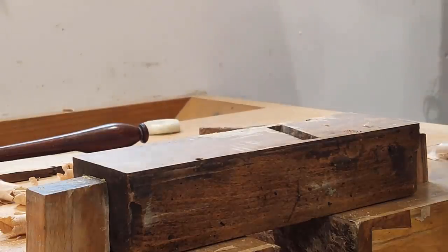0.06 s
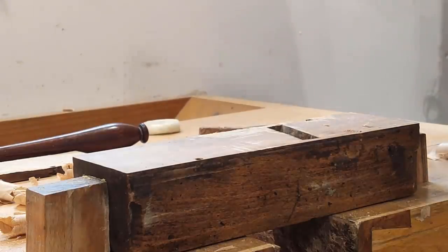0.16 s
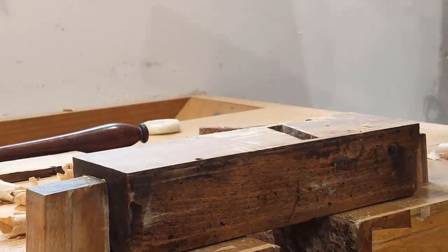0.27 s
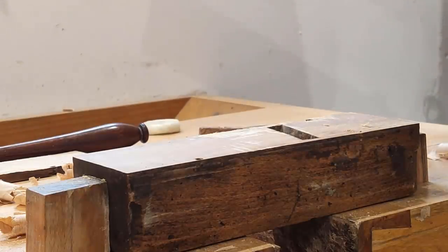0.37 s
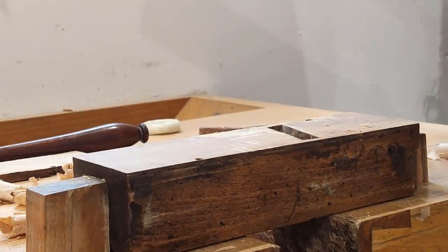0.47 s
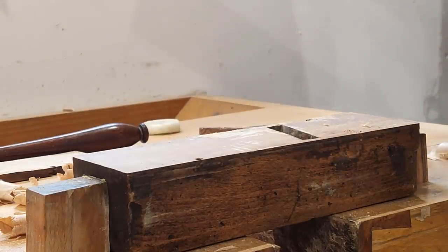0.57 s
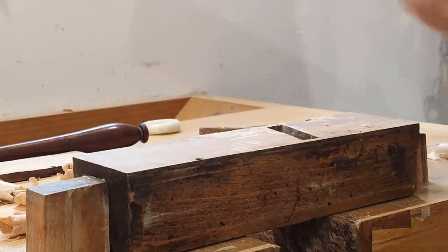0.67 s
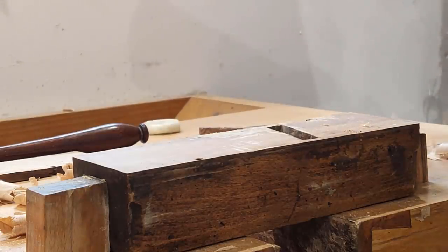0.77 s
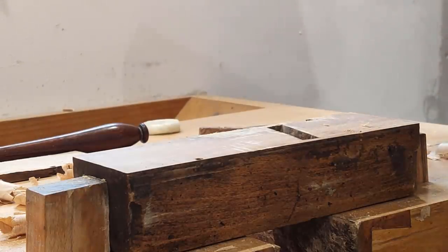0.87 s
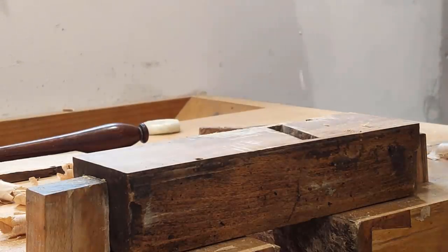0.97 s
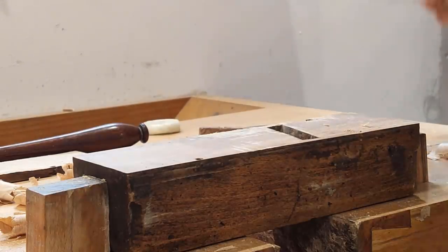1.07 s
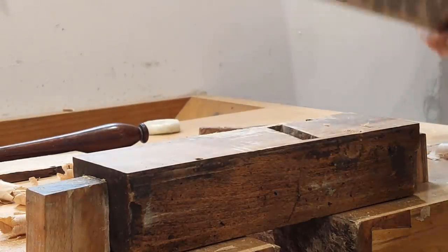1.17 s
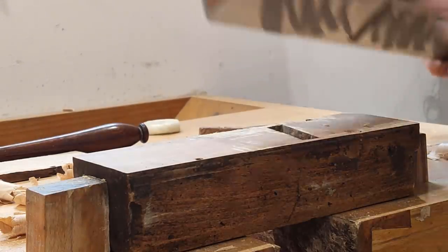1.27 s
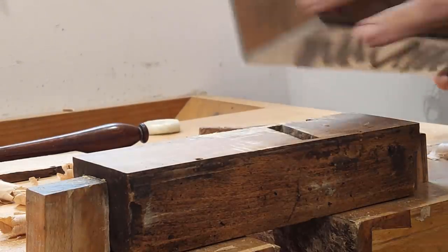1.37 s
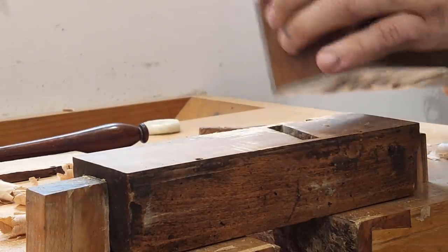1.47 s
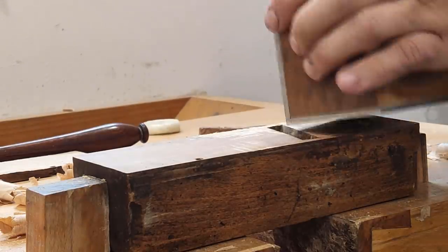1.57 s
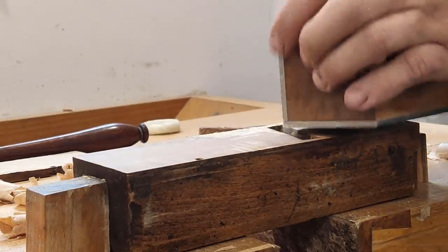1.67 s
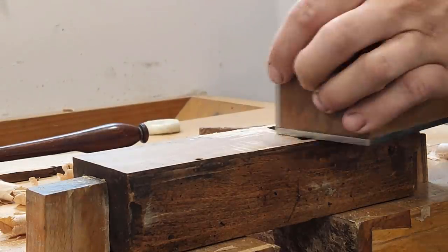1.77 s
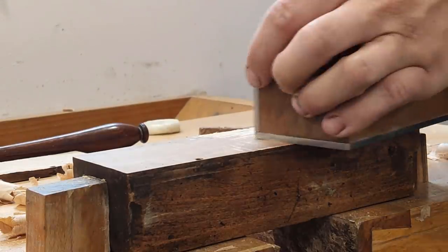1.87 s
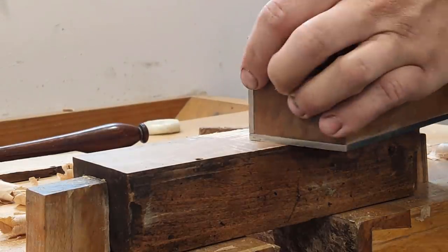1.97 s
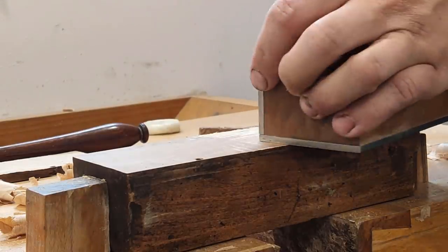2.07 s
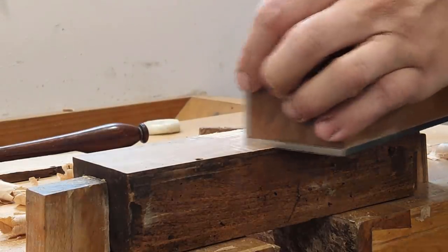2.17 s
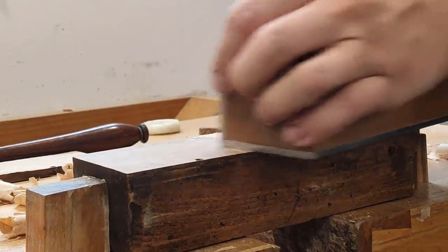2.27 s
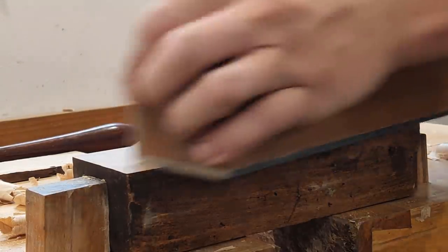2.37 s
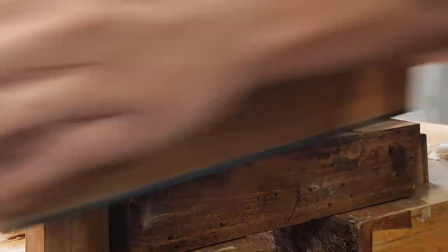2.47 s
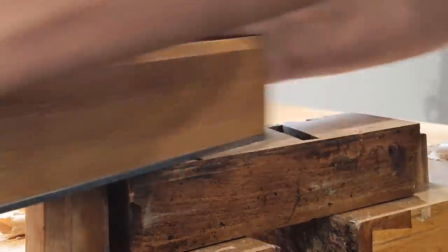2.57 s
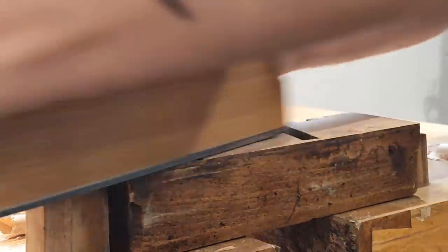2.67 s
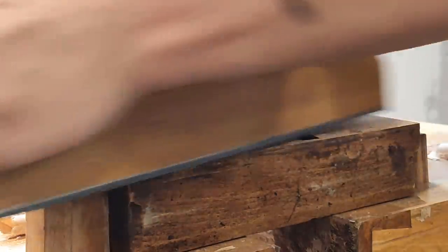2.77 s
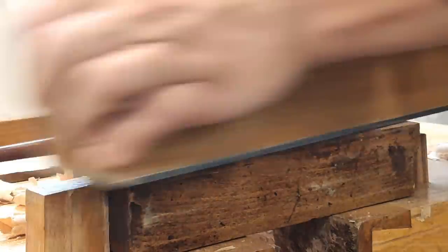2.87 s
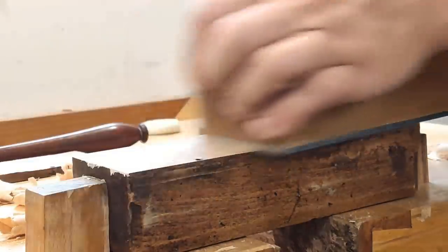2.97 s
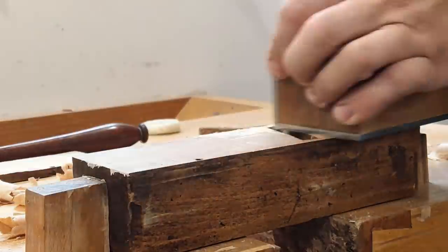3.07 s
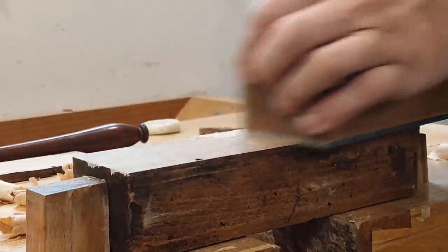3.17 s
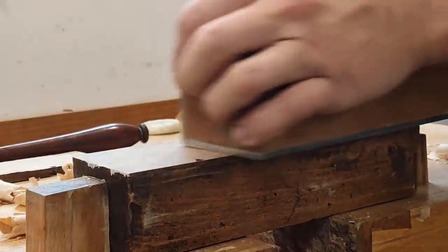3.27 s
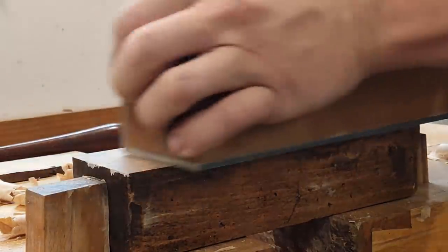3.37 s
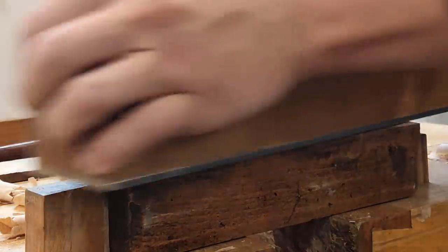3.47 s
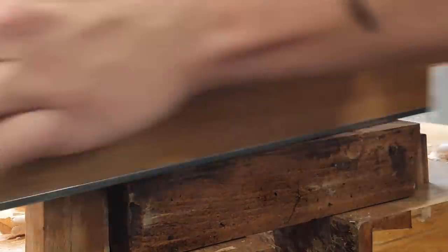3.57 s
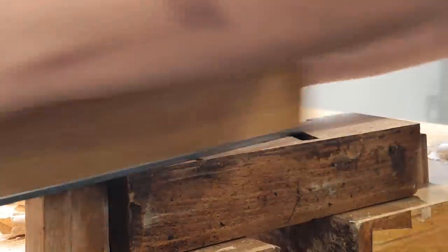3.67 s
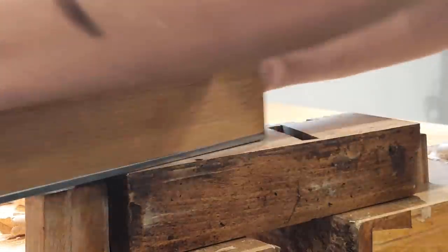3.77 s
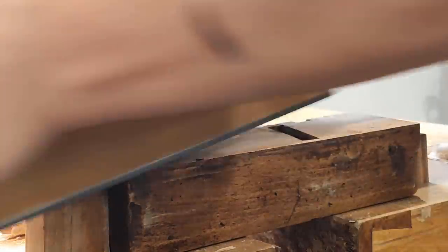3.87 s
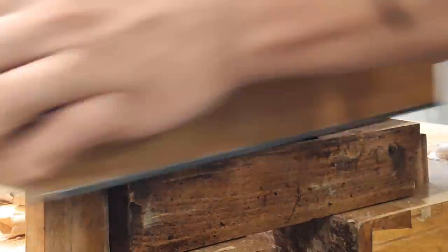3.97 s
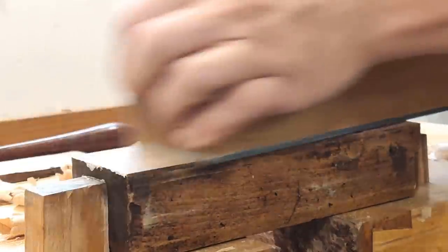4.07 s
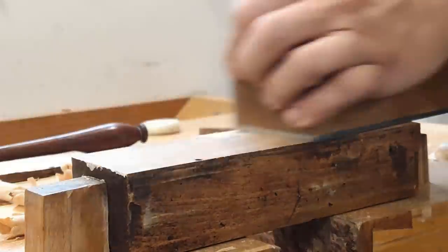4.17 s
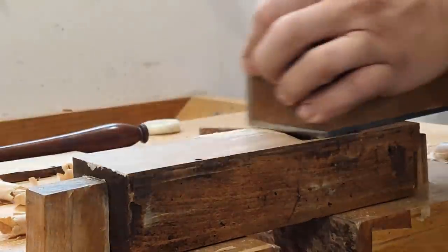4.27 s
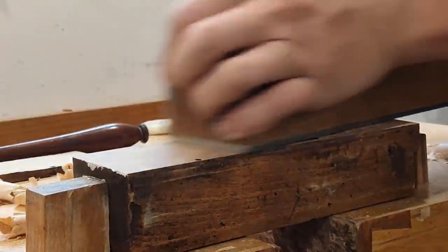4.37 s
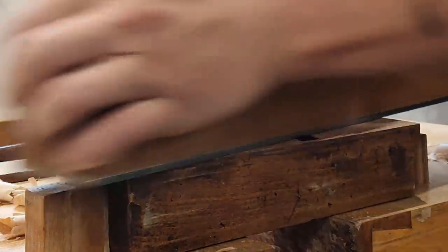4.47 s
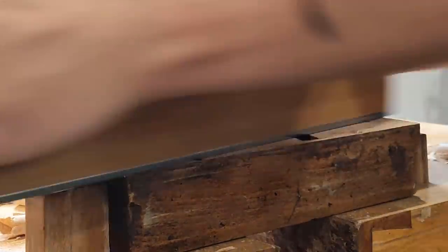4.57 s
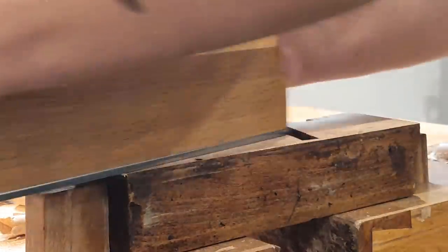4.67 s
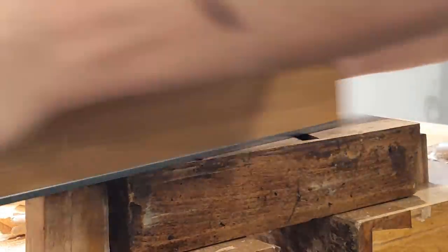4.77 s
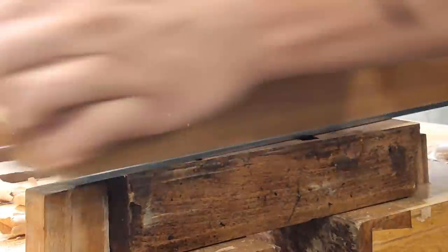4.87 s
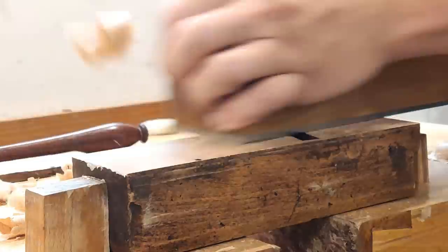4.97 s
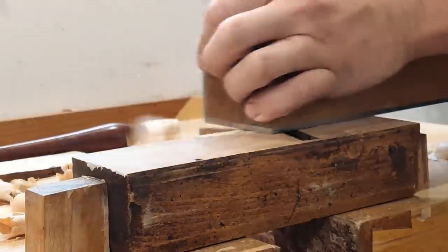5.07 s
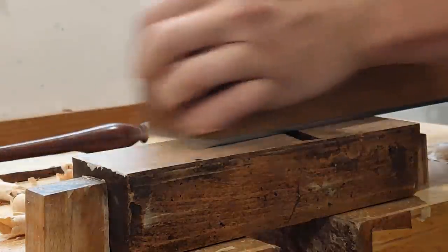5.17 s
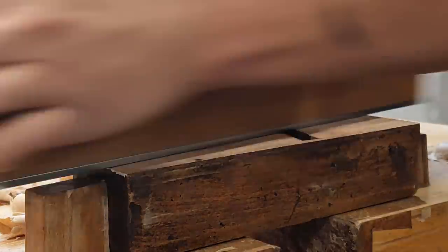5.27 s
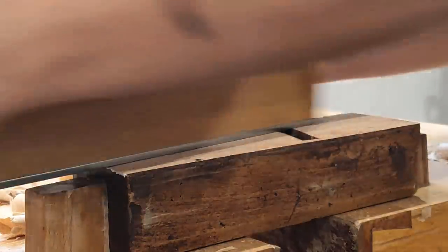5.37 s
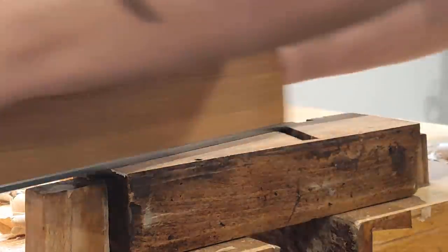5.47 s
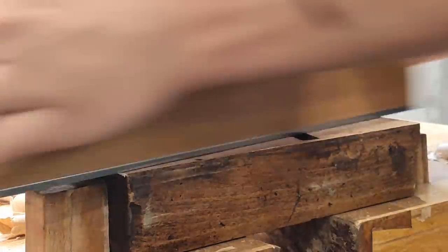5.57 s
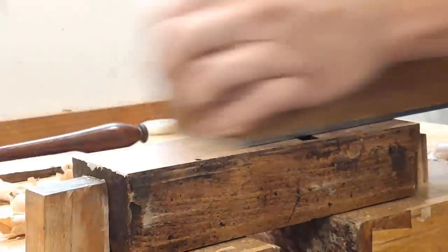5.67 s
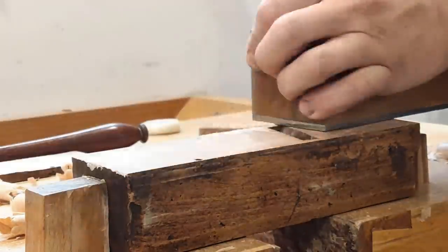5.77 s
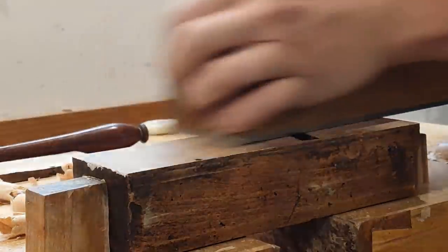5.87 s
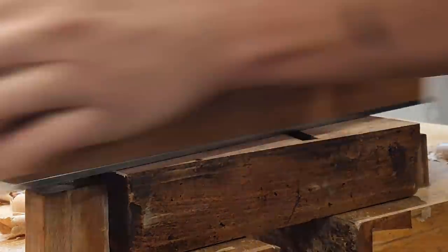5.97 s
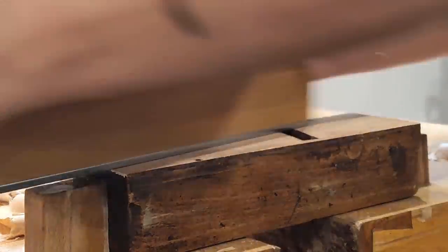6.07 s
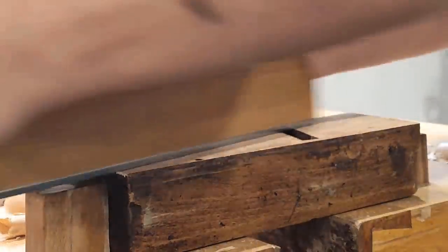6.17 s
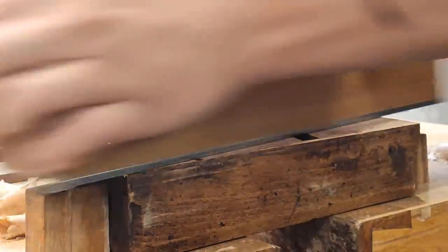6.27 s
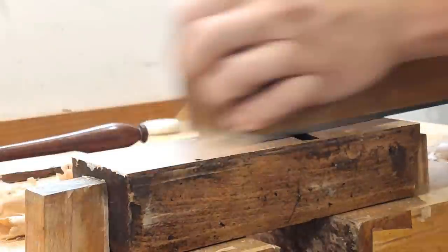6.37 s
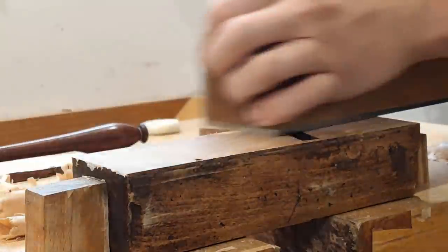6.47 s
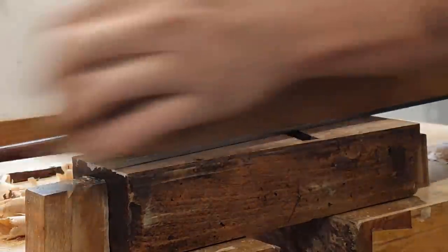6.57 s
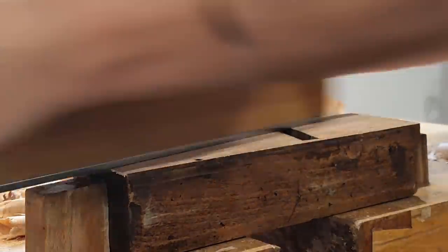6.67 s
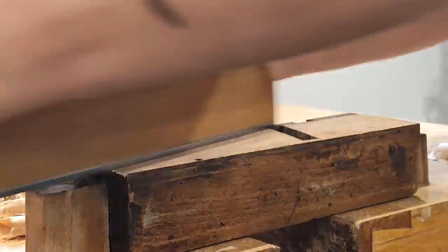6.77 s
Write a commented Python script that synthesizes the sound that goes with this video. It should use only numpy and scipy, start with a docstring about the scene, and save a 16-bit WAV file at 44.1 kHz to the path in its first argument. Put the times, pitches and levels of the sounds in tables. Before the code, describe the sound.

A hardwood board knocks down onto an upturned wooden plane, then rasps back and forth in quick short strokes with knocks, hiss and soft rustling.

```python
"""A board knocks down, then rasps to and fro in short strokes, with soft rustles and a quiet hum.
The hardwood board is pushed over the iron of a plane held upside down in a bench vice.
Dense stick-slip noise is filtered into rasp and hiss and rings board, plane, vice and bench.
Knocks are noisy pushes into the same modes; clothes and fingers are band-passed crackle.
A small hard-walled workshop adds a decaying noise tail."""
import sys
import numpy as np
from scipy import signal
from scipy.fft import rfft, irfft, next_fast_len
from scipy.io import wavfile
from scipy.ndimage import uniform_filter1d

SR = 44100
rng = np.random.default_rng(int(sys.argv[2]) if len(sys.argv) > 2 else 0)


def master_out(mix):
    """Clip the mix to full scale and print it as 16-bit PCM to the path in sys.argv[1]."""
    frames = np.transpose(np.atleast_2d(mix))
    ceiling = np.clip(frames, -1, 1)
    pcm = np.round(ceiling * 32767).astype(np.int16)
    wavfile.write(sys.argv[1], SR, pcm)


N = 300762

# bench top modes: f/Hz, width/Hz, level/dB
BENCH_MODES = [(95.5, 32, -6.5), (106.8, 14, -1), (125.6, 21, 2), (159.6, 17.2, 1), (182.6, 19, -5),
               (205.5, 14.6, 1), (237.4, 36.5, -11)]
# vice modes: f/Hz, width/Hz, level/dB
VICE_MODES = [(269, 80, -8), (357.7, 53, 1.5), (398.6, 52, 2), (460.4, 107, -2), (522.3, 11.4, -1.5),
              (578, 42, -7.5)]
# plane body modes: f/Hz, width/Hz, level/dB
PLANE_MODES = [(663, 22, -14), (718.5, 36, 1), (770, 195, 1), (815, 71, 4), (911, 71, -5.5)]
# board modes: f/Hz, width/Hz, level/dB
BOARD_MODES = [(1385, 60, -6), (1497, 45, 0), (1560, 55, -1), (1650, 80, -4), (1803, 60, -10),
               (1950, 120, -9)]


def undb(db):
    """Gain of a level in dB."""
    return 10 ** (np.asarray(db) / 20)


def rms(x):
    """Root mean square over all rows."""
    return np.sqrt(np.mean(x ** 2))


def unit(x):
    """Scale to rms 1."""
    return x / rms(x)


def on_log(hz, points):
    """Read a (Hz, value) line on a log-frequency axis."""
    f, v = np.transpose(points)
    return np.interp(np.log(hz + 1), np.log(f), v)  # + 1 keeps 0 Hz finite


def colour(x, points):
    """Shape the spectrum by (Hz, dB) points."""
    length = x.shape[-1]
    size = next_fast_len(length)
    hz = np.arange(size // 2 + 1) * SR / size
    return irfft(rfft(x, size) * undb(on_log(hz, points)), size)[..., :length]


def band(x, lo_hz, hi_hz):
    """Band-pass."""
    sos = signal.butter(2, [lo_hz, hi_hz], "band", fs=SR, output="sos")
    return signal.sosfilt(sos, x)


def ring(x, modes):
    """Drive a body's damped modes, neighbours in opposite sign."""
    out = 0
    for k, (hz, width_hz, db) in enumerate(modes):
        b, a = signal.iirpeak(hz, hz / width_hz, fs=SR)
        out = out + (-1) ** k * undb(db) * signal.lfilter(b, a, x)
    return out


def walk(rate_hz):
    """Random line of rms 1 that slews to a new value every 1 / rate_hz seconds."""
    k = int(SR / rate_hz)
    steps = np.repeat(rng.standard_normal(N // k + 1), k)[:N]
    return unit(uniform_filter1d(steps, k))


def slips(spread_db, patchy_db, count):
    """Dense tiny slips of uneven size, stronger in patches; the rows share sizes, not signs."""
    sizes = undb(spread_db * rng.exponential(size=N) + patchy_db * walk(60))
    return unit(rng.standard_normal((count, N)) * sizes)


def pair(size):
    """Left and right room noise, more alike in the bass than in the treble."""
    # left-right correlation: f/Hz, correlation
    likeness = [(150, 0.93), (300, .75), (600, 0.44), (1200, 0), (3000, .0)]
    fast = 2 * next_fast_len(size // 2 + 1)
    hz = np.arange(fast // 2 + 1) * SR / fast
    like = np.clip(on_log(hz, likeness), 0, 0.99)
    mid, side = rfft(rng.standard_normal((2, fast))) * np.sqrt([1 + like, 1 - like])
    return irfft(np.array([mid + side, mid - side]), fast)[:, :size] / np.sqrt(2)


def workshop():
    """Quiet noisy air, a wavering hum, and the sway of the bench pushing air at 15-35 Hz."""
    # spectrum of the air: f/Hz, relative density/dB
    air_spectrum = [(35, -20), (60, 0), (81, -15), (220, -7), (247, -29), (277, -17.5), (381, -14),
                    (457, -23), (755, -22), (1110, -25), (3810, -32.5), (7560, -44.5), (14000, -41.5)]
    # hum tones: f/Hz, level/dB ahead of the offset below
    hum_tones = [(52, -65), (203, -60.5), (244, -61.5)]
    # bench sway: t/s, level/dB
    sway_curve = [(0.0, -67), (0.09, -56), (2.28, -49.5), (2.3, -41), (2.55, -38.5), (3.23, -55),
                  (3.3, -36), (3.76, -40), (4.2, -47), (4.63, -31.5), (5.13, -51), (5.45, -30), (5.96, -49),
                  (6.14, -26), (6.44, -50), (6.82, -33)]
    t = np.arange(N) / SR
    air_db = -51 + 1.5 * walk(2.5)
    air = unit(colour(pair(N), air_spectrum)) * undb(air_db)
    hum = 0
    for hz, db in hum_tones:
        level = undb(db + 2.5 + 0.4 * walk(6))
        phase = 2 * np.pi * np.cumsum(hz * (1 + 0.0096 * walk(6.3))) / SR
        hum = hum + level * np.sin(phase)
    sway_noise = unit(band(band(pair(N), 15, 35), 15, 35))
    sway = sway_noise * undb(np.interp(t, *np.transpose(sway_curve)))
    return air + hum + sway


def answer(lag, size=2 ** 15):
    """Room response to a click: direct sound, left late by lag samples, and a tail decaying per octave."""
    # reverberation time: f/Hz, t60/s
    decay_times = [(125, 0.58), (400, 0.44), (1500, 0.59), (4500, 0.61), (11000, 0.47)]
    room_db = 0  # tail energy against direct sound
    t = np.arange(size) / SR
    octave = np.log2(np.arange(size // 2 + 1) * SR / size + 1)
    noise = rfft(pair(size))
    tail = 0
    for k in range(5, 16):
        octave_noise = irfft(noise * np.clip(1 - np.abs(octave - k), 0, 1))
        tail = tail + octave_noise * undb(-60 * t / on_log(2. ** k, decay_times))
    onset = np.clip((t - 0.002) / 0.0024, 0, 1)
    near = 1 + 1.44 * np.exp(-t / 0.013)  # near surfaces answer first and strongest
    tail = tail * onset * near
    out = undb(room_db) * tail / np.sqrt(np.sum(tail ** 2) / 2)
    out[0, max(lag, 0)] = out[1, max(-lag, 0)] = 1
    return out / np.sqrt(1 + undb(2 * room_db))


def room(x):
    """The work moves along the bench: cross-fade cyclically through the answers of several places."""
    # lag of the left channel at each place: lag/samples
    left_lags = [-9, 3, 14, -1]
    place_s = 0.13
    count, size = len(left_lags), next_fast_len(N + SR)
    place = np.arange(N) / SR / place_s % count
    out = 0
    for k, lag in enumerate(left_lags):
        away = np.abs((place - k + count / 2) % count - count / 2)
        here = x * np.cos(np.pi / 2 * np.clip(away, 0, 1))
        out = out + rfft(here, size) * rfft(answer(lag), size)
    return irfft(out, size)[:, :N]


def rustle():
    """Cloth and fingers brush in soft crackly noise; each brush swells and fades linearly in dB."""
    # brushes: peak t/s, swell/s, fade/s, mid level/dB, top against mid/dB, low against mid/dB
    brushes = [(.01, 0.013, 0.085, -59.5, -12, 13), (.302, 0.12, 0.13, -53, -5, -2),
               (.565, 0.13, 0.17, -47, -8, -16), (0.69, 0.12, 0.013, -42, -4.5, -5.5),
               (.916, 0.025, .05, -49.5, 6, -7), (.956, 0.028, 0.023, -47.5, -21, -28),
               (1.42, 0.0038, 0.063, -43, -5.5, -23), (1.646, 0.024, .02, -54.5, -2, -28),
               (2.146, 0.029, 0.032, -52.5, -1, 1.5), (2.88, 0.2, 0.088, -47.5, -1, 0.5),
               (4.0, 0.29, 0.09, -52, -18, 4), (4.886, 0.065, 0.032, -44, 0, -6),
               (5.65, 0.051, 0.021, -52, 8, 2), (6.32, 0.054, 0.036, -53, -12, 9.5)]
    swell_db, restless_db = 18.5, -73.5  # rise over a swell, fall over a fade; constant faint rustle
    t = np.arange(N) / SR
    gains = undb(restless_db) * undb([[0], [-8], [-3]])
    for s, swell_s, fade_s, peak_db, top_db, low_db in brushes:
        slope_s = np.clip(np.where(t < s, swell_s, fade_s), 0.001, 1)
        shape_db = -swell_db * np.abs(t - s) / slope_s
        gains = gains + undb(peak_db + shape_db) * undb([[0], [top_db], [low_db]])
    mid, top, low = gains
    fibres = slips(spread_db=2.4, patchy_db=2.0, count=3)
    out = mid * unit(band(fibres[0], 1280, 6550))
    out = out + top * unit(band(fibres[1], 10000, 20000))
    return out + low * unit(band(fibres[2], 340, 1440))


def knocks():
    """Each blow is a short rattling push into bench, vice, plane and board, with a dry crack and a tick."""
    # blows: t/s, then peak levels: bench top/dB, vice and plane/dB, board/dB, crack/dB, tick/dB
    blows = [(1.678, -13.5, -24.5, -62, -48, -25.5), (1.689, -19.5, -17, -59, -52, -47),
             (1.703, -21, -14.5, -58, -53, -54), (1.829, -23, -16.5, -26.5, -28.5, -51),
             (1.834, -18.5, -13, -47, -51, -60), (2.27, -42, -47, -37, -48, -55),
             (2.291, -27.5, -39, -37, -34, -46), (2.549, -44, -24, -34, -13, -11),
             (2.71, -39, -32.5, -36, -31.5, -58), (2.898, -19, -22, -11.5, -19, -33),
             (2.92, -11.5, -17, -44, -52, -32), (3.102, -39, -24, -22.5, -17, -38),
             (3.289, -33, -36, -20.5, -19.5, -36), (3.709, -34, -25.5, -40, -28, -20.5),
             (4.029, -14, -16.5, -27, -24, -17.5), (4.076, -17, -6, -18, -14, -29),
             (4.082, -20, -10, -28, -26, -40), (4.096, -26, -16, -40, -44, -39),
             (4.111, -22, -10, -42, -40, -44), (4.125, -26, -14, -15, -24, -41),
             (4.249, -30, -19.5, -15, -42, -46), (4.435, -21.5, -23, -16, -14.5, -25),
             (4.932, -33, -45, -42, -19.5, -29), (5.023, -55, -50, -7, -17, -12.5),
             (5.228, -29.5, -33, -21, -31, -42), (5.6, -27, -75, -74, -71, -53),
             (5.641, -36, -40, -50, -58, -53), (5.663, -37, -34, -22, -35, -31),
             (5.745, -38, -21, 1, -17, -4.5), (5.808, -53, -17, -39, -31, -36),
             (5.966, -21, -31, -17, -22, -36), (6.052, -21, -24, -25, -34, -25),
             (6.337, -36, -27.5, -19, -24, -36), (6.385, -40, -47, -18, -41, -36),
             (6.422, -27, -27, -6, -27, -8), (6.436, -39, -31, -5.5, -19, -16),
             (6.598, -25.5, -27, -18, -22, -30), (6.759, -23, -37, -47, -40, -40)]
    out, t = np.zeros(N + SR), np.arange(SR // 6) / SR
    hands = np.exp(-np.clip(t - 0.005, 0, 1) / 0.0025)  # the hands damp the board
    for s, *parts_db in blows:
        grit = rng.standard_normal((4, len(t)))
        push = (1 + 3.24 * grit[0]) * np.exp(-t / 0.0045)
        thud = ring(band(push, 130, 400), BENCH_MODES)
        knock = ring(band(push, 206, 730), VICE_MODES)
        knock = knock + undb(-9.5) * ring(band(push, 200, 1280), PLANE_MODES)
        knock = knock + undb(-15) * band(grit[0] * np.exp(-t / 0.0034), 300, 1650)
        tap = grit[1] * t * np.exp(-t / 0.00076)
        tock = ring(band(tap, 1000, 1640), BOARD_MODES) * hands
        crack = band(grit[2] * np.exp(-t / 0.0045), 1140, 2500)
        tick = band(grit[3] * np.exp(-t / 0.0013), 3400, 8100)
        i = int(s * SR)
        for part, db in zip((thud, knock, tock, crack, tick), parts_db):
            out[i:i + len(t)] += undb(db) * part / np.abs(part).max()
    return out[:N]


def controls():
    """Gains of coarse rasp, bright rasp, hiss, board, plane, vice and bench; zero between strokes."""
    # one curve a stroke, first the end of a shove, then cuts and drags back in turn:
    # t/s, rasp/dB, hiss against rasp/dB, vice judder/dB
    curves = [
        [(0.0, -45, -14, -48), (0.028, -70, -9, -53), (0.126, -73, 12, -67), (0.132, -64, -5, -68),
         (0.138, -76, 6, -64), (0.178, -77, 6, -67), (0.2, -74, 0, -78)],
        [(2.265, -49, -22, -42), (2.293, -50.5, -2, -38.5), (2.361, -56, -2, -44), (2.417, -38, -3.5, -43),
         (2.529, -36, -2.5, -46.5), (2.543, -30, -2.5, -35.5), (2.7, -58, 4, -55)],
        [(2.9, -42, -17, -20), (2.93, -38.5, -6, -29), (2.972, -39, -8, -36), (3.024, -39, -15, -38.5),
         (3.076, -44.5, -23, -61), (3.112, -48, -10, -26.5), (3.18, -51, 0, -45)],
        [(3.19, -43, -3, -53), (3.278, -39, 2, -54), (3.312, -31.5, -10, -35), (3.37, -41.5, -3, -34.5),
         (3.63, -29, -14.5, -47), (3.722, -31, -2, -42.5), (3.84, -85, -19, -50)],
        [(4.03, -25, -7, -23), (4.068, -61, -13, -16), (4.078, -22.5, -17, -16), (4.112, -35, -26, -16.5),
         (4.22, -34, -21.5, -36), (4.254, -49, -6, -31), (4.36, -59, -21, -55)],
        [(4.435, -42, -15, -36), (4.447, -38.5, 0, -27.5), (4.507, -32, -14, -29), (4.543, -33, -1, -28),
         (4.579, -25.5, -7.5, -37.5), (4.657, -35, -2, -37), (4.78, -61.5, -3, -62)],
        [(4.93, -33.5, -5, -37.5), (4.962, -44, -6, -36), (5.004, -43, -6, -45), (5.028, -29, -5.5, -35),
         (5.066, -31.5, -8, -34), (5.122, -42.5, -12, -31.5), (5.19, -60, -13, -69)],
        [(5.215, -40, -11, -41), (5.227, -39, -5, -42), (5.311, -30.5, -6, -28), (5.341, -36.5, 5.5, -33),
         (5.389, -26.5, 2.5, -34), (5.459, -46, -4, -35.5), (5.55, -70, -13, -69)],
        [(5.662, -32, -11, -42), (5.726, -28.5, -13, -42), (5.756, -29.5, 0, -35.5), (5.792, -34.5, -10, -29),
         (5.814, -45, -10, -29.5), (5.868, -63, -15, -42.5), (5.92, -48, -4, -29)],
        [(5.962, -29, -6, -25), (5.97, -28.5, -12, -36), (6.002, -30.5, -3.5, -29.5), (6.108, -30, 4.5, -34.5),
         (6.13, -31.5, -2, -28), (6.174, -51, -17, -53.5), (6.26, -62, -8, -29)],
        [(6.335, -37, -23, -41.5), (6.357, -35.5, -2, -35), (6.407, -35.5, -4, -55), (6.429, -32, 2, -34),
         (6.433, -35.5, 0, -27), (6.539, -39.5, -22, -45), (6.56, -45, -11, -41)],
        [(6.598, -32, -7.5, -40), (6.666, -32, 2.5, -30.5), (6.684, -32.5, 3.5, -29), (6.73, -33, 2.5, -40),
         (6.754, -33.5, 1, -27), (6.77, -42, 4, -28), (6.82, -51, -4, -67)],
    ]
    # one row a stroke, offsets: bright rasp/dB, board/dB, plane/dB, bench/dB
    mixes = [(-2, -5, 4, 11.5), (3, -2, 3.5, 5), (1, -2, -3, 2.5), (1, -4, 5.5, 2), (1.5, 1, -3, -3.5),
             (4, -5.5, 3.5, 0.5), (1, 4, -6.5, -7.5), (3, -3.5, 0.5, 0.5), (-1, -3.5, -13, 3),
             (2.5, -4, -1, 3), (3, 4.5, -3, -5), (1.5, 2.5, 1.5, 0.5)]
    bite_s, lift_s = 0.0022, 0.068
    # 0-1: bright rasp follows hiss, plane follows judder, bench follows rasp
    bright_share, plane_share, bench_share = 0.58, 0.58, 0.23
    t, out = np.arange(N) / SR, 0
    for curve, (bright_db, board_db, plane_db, bench_db) in zip(curves, mixes):
        s, rasp_db, hiss_db, judder_db = np.transpose(curve)
        layers_db = [
            rasp_db,
            rasp_db + bright_db + bright_share * hiss_db,
            rasp_db + hiss_db,
            rasp_db + board_db,
            rasp_db + plane_db + plane_share * (judder_db - rasp_db),
            judder_db,
            judder_db + bench_db + bench_share * (rasp_db - judder_db),
        ]
        on = np.clip(np.minimum((t - s[0]) / bite_s, (s[-1] - t) / lift_s), 0, 1)
        out = out + on * undb([np.interp(t, s, db) for db in layers_db])
    return out


def strokes():
    """Stick-slip friction rasps and hisses at the iron and rings board, plane, vice and bench."""
    # rasp spectrum: f/Hz, relative density/dB
    rasp_spectrum = [(590, -9), (1000, 1.5), (1260, 1.5), (1570, 2), (3380, 2.5), (4540, -1), (5200, -6),
                     (7000, -0.5), (10400, -38), (17600, -90)]
    # iron modes: f/Hz, width/Hz, level/dB
    iron_modes = [(2250, 460, 7), (2930, 710, 6), (3600, 400, 0), (4560, 500, 5), (6200, 1500, 0)]
    # fine hiss spectrum: f/Hz, relative density/dB
    hiss_spectrum = [(5500, -10.5), (7500, 1), (10500, -2), (12000, -3), (14000, -7.5)]
    coarse, bright, hiss, *gains = controls()
    force = slips(spread_db=2.3, patchy_db=2.2, count=5)
    judder = slips(spread_db=2.7, patchy_db=3.34, count=2)
    iron = 0
    for mode in iron_modes:
        flare = undb(4 * walk(9))  # each mode's level wanders on its own
        iron = iron + flare * ring(force[:2], [mode])
    edge = unit(colour(force[:2], rasp_spectrum)) + undb(2.0) * unit(iron)
    out = unit(band(edge[0], 1080, 2720)) * undb(3.0 + 0.28 * walk(30)) * coarse
    out = out + unit(band(edge[1], 3610, 6230)) * undb(2.5 + 0.53 * walk(30)) * bright
    out = out + unit(colour(force[2], hiss_spectrum)) * undb(2 * walk(25)) * hiss
    drives = (force[3], force[4], judder[0], judder[1])
    bodies = (BOARD_MODES, PLANE_MODES, VICE_MODES, BENCH_MODES)
    for gain, drive, modes in zip(gains, drives, bodies):
        out = out + unit(ring(gain * drive, modes)) * rms(gain)
    return out


def scene():
    """Work sounds in the room over the background."""
    work = strokes() + knocks() + rustle()
    return room(work) + workshop()


def record(dry):
    """The right channel is a little more sensitive; loud peaks are rounded and the top is cut."""
    right_db, top_hz = 0.2, 14200
    rounded = np.tanh(0.55 * dry * undb([[0], [right_db]])) / 0.65
    top_cut = signal.ellip(12, 0.2, 90, top_hz, fs=SR, output="sos")
    return signal.sosfilt(top_cut, rounded)


dry = scene()
out = record(dry)
master_out(out)
```